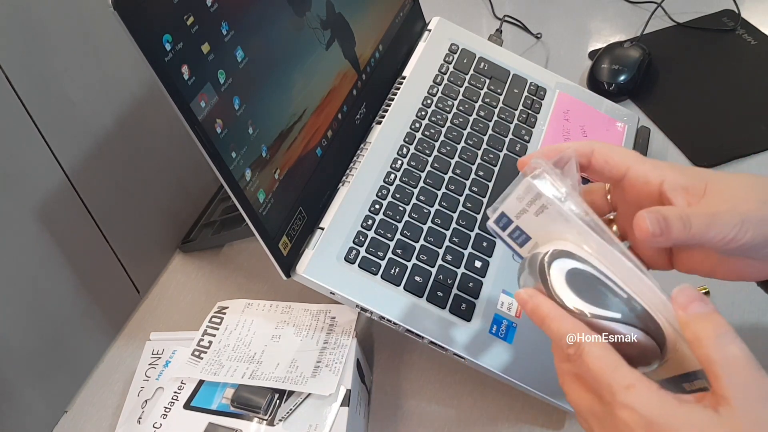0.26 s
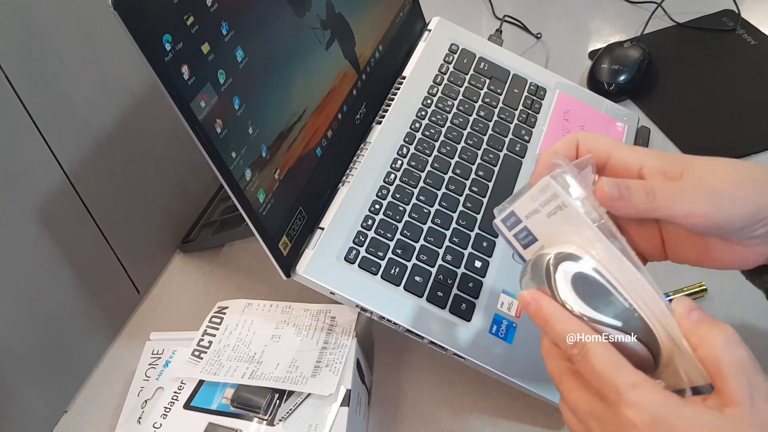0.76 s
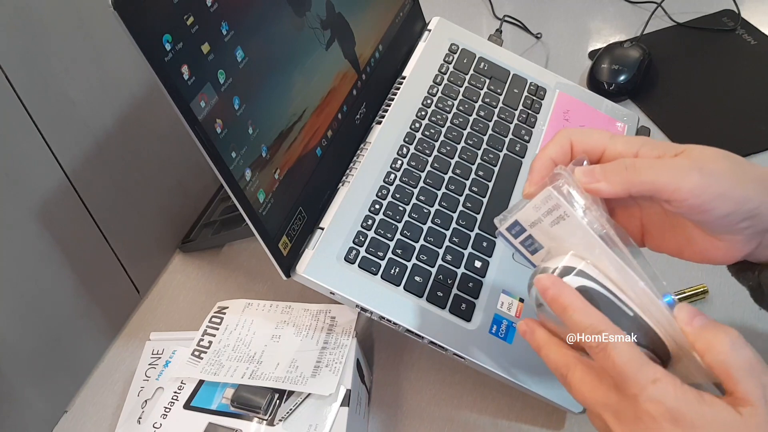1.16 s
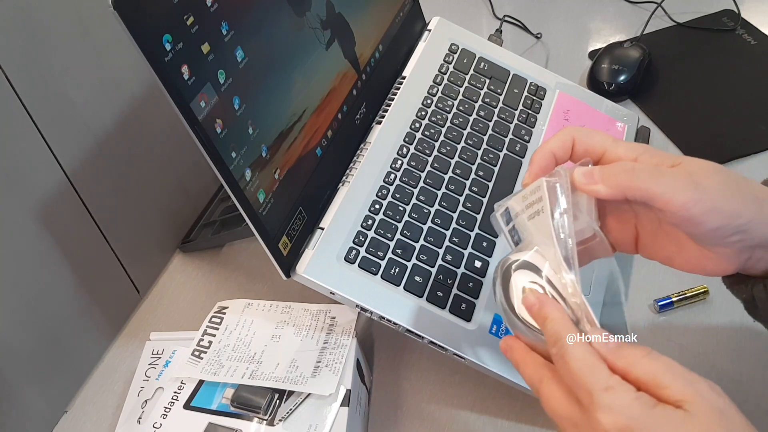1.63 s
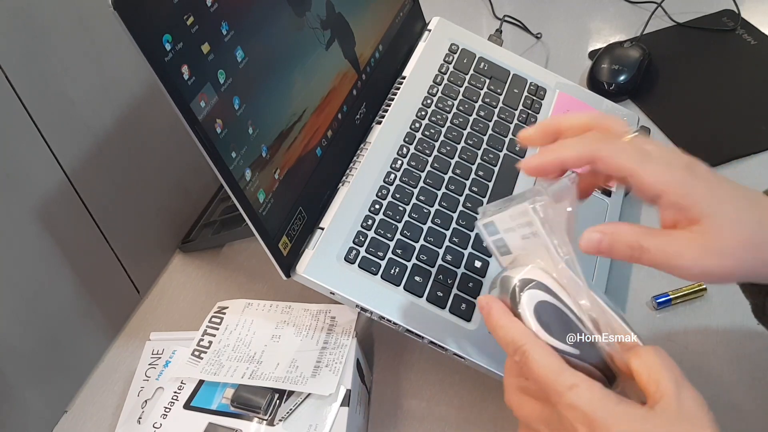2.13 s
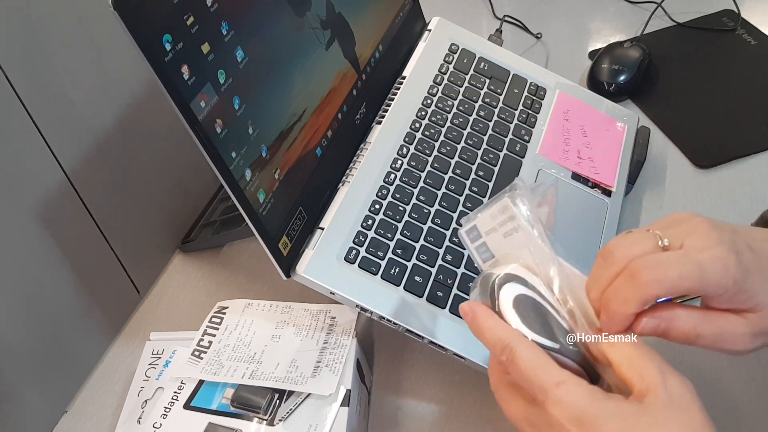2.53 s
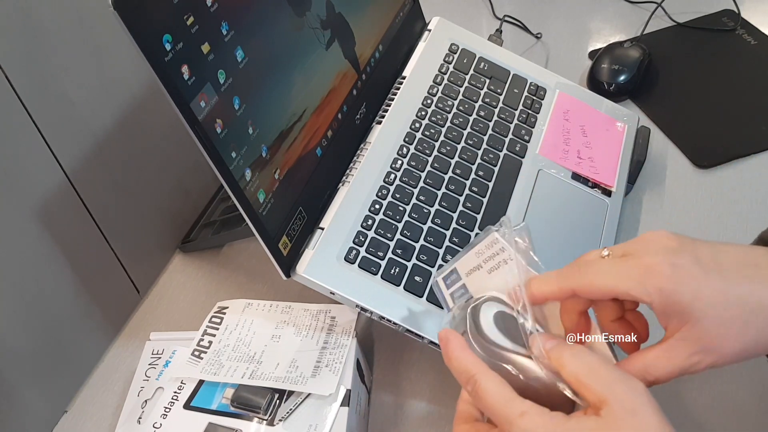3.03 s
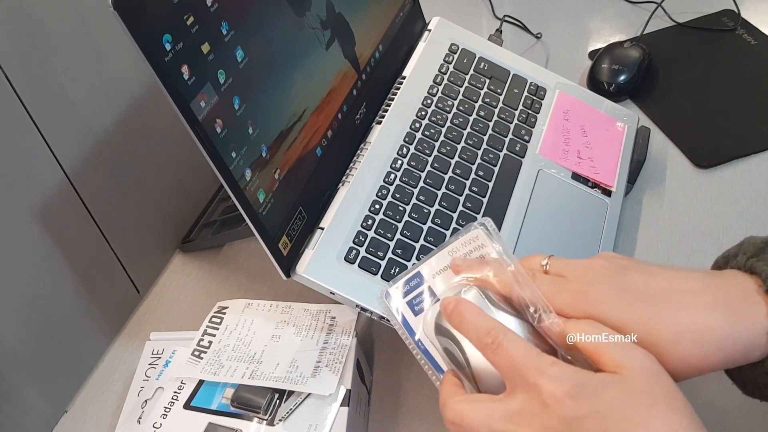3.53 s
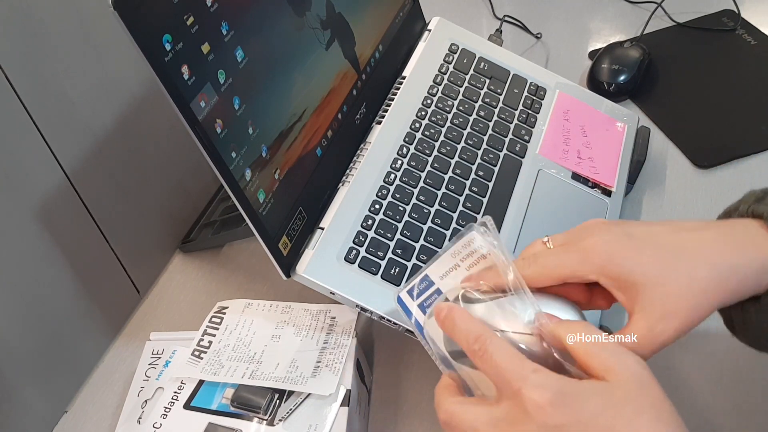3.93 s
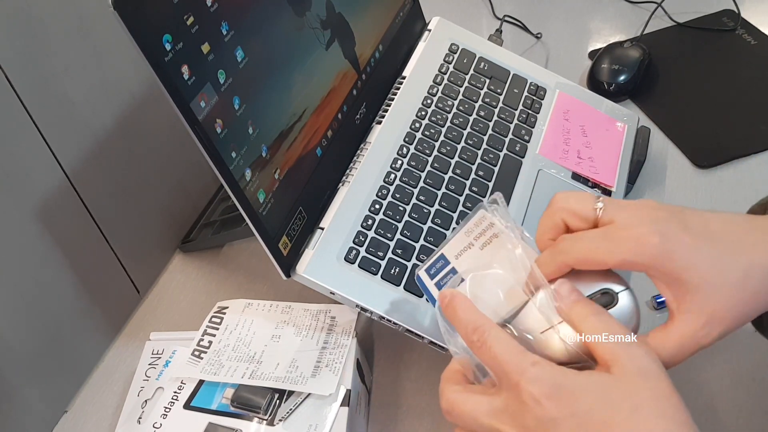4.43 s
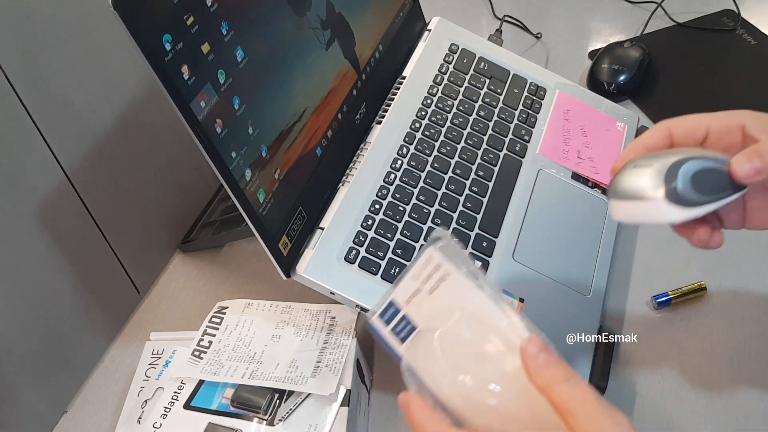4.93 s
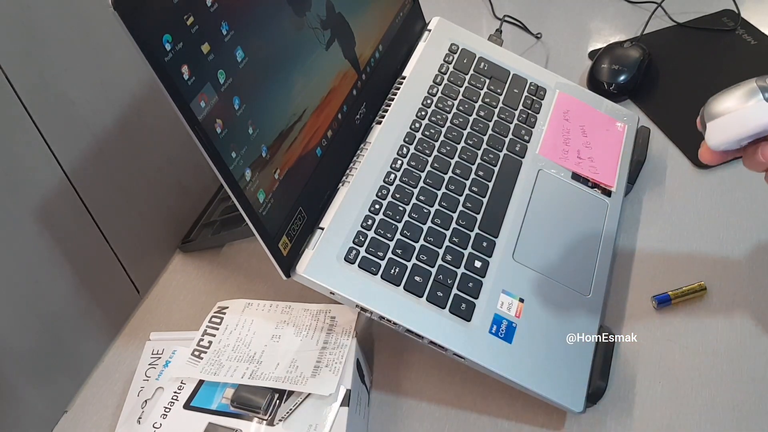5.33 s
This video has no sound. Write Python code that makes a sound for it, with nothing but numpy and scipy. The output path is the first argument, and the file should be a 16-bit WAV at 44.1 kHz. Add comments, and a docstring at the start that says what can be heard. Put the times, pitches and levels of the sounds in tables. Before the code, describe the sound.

Close, dry plastic crackling with one very loud early snap, scattered clicks and rustle, and a short sliding scrape before quiet returns.

```python
"""A low rumble, hiss and a faint rustle come first; then hands bend and pry open a stiff clear plastic
blister pack over a desk in a small quiet room. The seam creaks in stick-slip clicks through shell modes;
creases snap as a click and dying rattle that ring the hollow shell. Rustle is clumped, coloured grain noise;
late on, a hard object slides out in a scrape. Two spaced microphone ports hear it all with a room tail."""
import sys
import numpy as np
from scipy import signal
from scipy.fft import rfft, irfft, next_fast_len
from scipy.io import wavfile
from scipy.ndimage import uniform_filter1d

SR = 44100
rng = np.random.default_rng(int(sys.argv[2]) if len(sys.argv) > 2 else 0)


def transcribe(signal):
    """Save signal, clipped to [-1, 1], as a 16-bit WAV file at the path in sys.argv[1]."""
    frames = np.atleast_2d(signal).T
    limited = np.clip(frames, -1, 1)
    pcm = np.round(limited * 32767).astype(np.int16)
    wavfile.write(sys.argv[1], SR, pcm)


N = 245706


def from_db(db):
    """Decibels to amplitude gain."""
    return 10 ** (np.asarray(db) / 20)


def rms_one(x):
    """Scale to rms 1."""
    return x / np.sqrt(np.mean(x ** 2) + 1e-20)


def in_time(rows):
    """Interpolate the columns of a curve, sample by sample."""
    time_s, *columns = np.transpose(rows)
    return [np.interp(np.arange(N) / SR, time_s, column) for column in columns]


def at_hz(points, hz):
    """Interpolate a table over log frequency."""
    points_hz, values = np.array(points).T
    return np.interp(np.log(np.maximum(hz, 1)), np.log(points_hz), values)


def coloured(x, gain):
    """Filter in the frequency domain by a gain given as a function of Hz."""
    size = next_fast_len(x.shape[-1])
    spectrum = rfft(x, size) * gain(np.fft.rfftfreq(size, 1 / SR))
    return irfft(spectrum, size)[..., :x.shape[-1]]


def band(x, low_hz, high_hz):
    """Causal Butterworth band-pass."""
    return signal.sosfilt(signal.butter(2, [low_hz, high_hz], "band", fs=SR, output="sos"), x)


def resonance(x, hz, width_hz):
    """Two-pole resonance with gain 1 on top."""
    r = np.exp(-np.pi * width_hz / SR)
    poles = [1, -2 * r * np.cos(2 * np.pi * hz / SR), r * r]
    return signal.lfilter([(1 - r * r) / 2, 0, (r * r - 1) / 2], poles, x)


# likeness of left and right in diffuse sound: freq_hz, correlation
PORT_LIKENESS = [(60, 1), (180, 0.62), (550, 0.57), (1650, 0.0034), (4970, 0.43), (15000, 0.077)]


def diffuse(white):
    """Mix two noises into left and right, whose likeness depends on frequency."""
    mid = coloured(white[0], lambda hz: np.sqrt(1 + np.clip(at_hz(PORT_LIKENESS, hz), -1, 1)))
    side = coloured(white[1], lambda hz: np.sqrt(1 - np.clip(at_hz(PORT_LIKENESS, hz), -1, 1)))
    return np.array([mid + side, mid - side])


LEFT_LAG_S = 8e-5


def to_ports(x):
    """The pack is nearer to the right port: the left hears it later."""
    left = coloured(x[0], lambda hz: np.exp(-2j * np.pi * hz * LEFT_LAG_S))
    return np.array([left, x[1]])


def grit(count, spread_db):
    """Noise with uneven grain sizes; rms 1."""
    size_db = spread_db * np.minimum(rng.exponential(1, count), 4)
    return rms_one(rng.standard_normal(count) * from_db(size_db))


def scattered(colour, spread_db):
    """Dense grains from all over the sheet: partly direct, partly scattered to each port."""
    direct = grit(N, spread_db)
    spread = diffuse(np.array([grit(N, spread_db), grit(N, spread_db)]))
    return coloured(to_ports(direct + 0.78 * spread), lambda hz: from_db(at_hz(colour, hz)))


def clumps(spread_db):
    """A gain that comes and goes within a few milliseconds."""
    return from_db(spread_db * rms_one(uniform_filter1d(rng.standard_normal(N), size=250)))


# rumble and hiss spectrum: freq_hz, density_db (per Hz, relative)
QUIET_SPECTRUM = [(12, -47), (20, -14.5), (55, -5), (104, -4), (163, -20), (241, -34.5), (277, -33.5),
                  (310, -18), (347, -39.5), (499, -18), (542, -31.5), (802, -36.5), (8650, -53.5),
                  (12100, -36.5), (16000, -34.5)]
# balance of rumble and hiss: freq_hz, left_minus_right_db
QUIET_BALANCE = [(60, 0.5), (240, 6), (950, 0.5), (3770, -2), (15000, 0.5)]
QUIET_RMS_DB = -61.5


def quiet():
    """Steady rumble of the building and hiss of the microphone, as coloured diffuse noise."""
    left, right = diffuse(rng.standard_normal((2, N)))
    left = coloured(left, lambda hz: from_db(at_hz(QUIET_SPECTRUM, hz) + at_hz(QUIET_BALANCE, hz) / 2))
    right = coloured(right, lambda hz: from_db(at_hz(QUIET_SPECTRUM, hz) - at_hz(QUIET_BALANCE, hz) / 2))
    return from_db(QUIET_RMS_DB) * rms_one(np.array([left, right]))


# skin and contents rubbing on the sheet: time_s, level_db, treble_db (re level)
RUB_CURVE = [(0, -61.5, -8), (.08, -88, 4), (.19, -66.5, -1.5), (.34, -90, -10), (.82, -83, 0),
             (.86, -69, 4), (.95, -76.5, -1.5), (1.1, -73, 3), (1.2, -82, 7), (1.28, -46, 2),
             (1.33, -59.5, 1), (1.57, -54.5, 0.5), (1.62, -76, -5.5), (1.89, -77.5, 2), (1.93, -54, -5),
             (2.13, -59.5, -4), (2.23, -74, -8), (2.26, -69, 16), (2.33, -50, -6.5), (2.44, -67.5, 5),
             (2.6, -60, -5.5), (2.72, -74.5, -2.5), (2.86, -61, -1.5), (3.2, -62.5, -3), (3.27, -53, -1.5),
             (3.4, -61, -10), (3.68, -66.5, -0.5), (3.92, -56.5, -2), (4.03, -56.5, -6), (4.3, -63, 0),
             (4.42, -66.5, 0), (4.6, -59.5, 18), (4.67, -70.5, 0), (5.1, -81, 0), (5.45, -75, -3),
             (5.57, -63.5, 0)]
# rub grain spectrum: freq_hz, density_db (per Hz, relative)
RUB_SPECTRUM = [(150, -12), (320, 0), (560, 0), (900, -3), (1200, 0), (2000, -3), (3000, -5), (4500, -4),
                (8000, -14), (11000, -13), (16000, -17)]
# dull grains: level at a middle level of -63 dB; dB of dull swing per dB of middle swing
DULL_DB, DULL_FOLLOWS = -65.5, 0.76


def rub():
    """Fingers and contents rustle on the sheet; dull, middle and bright grains clump each in their own time."""
    level_db, treble_db = in_time(RUB_CURVE)
    dull_db = DULL_DB + DULL_FOLLOWS * (level_db + 63)
    grains = scattered(RUB_SPECTRUM, spread_db=3.5)
    rustle = 0
    for part_db, low_hz, high_hz, clump_db in [(level_db, 700, 3800, 2.4),
                                               (dull_db, 200, 800, 2.4),
                                               (level_db + treble_db, 2600, 16000, 2.2)]:
        part = rms_one(clumps(clump_db) * band(grains, low_hz, high_hz))
        rustle = rustle + from_db(part_db) * part
    return rustle


# stick-slip runs of the bent seam: start_s, end_s, slips_per_s (nominal), first_drive_db, last_drive_db
CREAK_RUNS = [(0.052, 0.104, 160, -77, -78), (0.212, 0.345, 155, -67, -95), (1.7, 1.897, 56, -75, -81),
              (1.915, 2.1, 110, -70, -67), (2.15, 2.243, 125, -57.5, -56.5), (2.528, 2.66, 56, -53, -80)]
# harder slips with a bright edge: time_s, drive_db, edge_db (re drive)
HARD_SLIPS = [(2.244, -42, 1.5), (2.255, -42, -12), (2.269, -41.5, -19), (2.279, -38.5, -9),
              (2.289, -48, -8), (2.302, -40, -27)]
# shell modes rung by the seam: freq_hz, width_hz, gain_db
SEAM_MODES = [(1190, 65, 5), (1354, 91, -6), (1500, 140, -22)]


def creak():
    """Slips of the seam, each a soft click into the shell's modes; hard ones add a short noise tick."""
    slips, edges = np.zeros((2, N))
    for start_s, end_s, per_s, first_db, last_db in CREAK_RUNS:
        live = slice(round(start_s * SR), round(end_s * SR))
        drift = rms_one(uniform_filter1d(rng.standard_normal(N), size=400))
        rate_per_s = per_s * from_db(2.8 * drift)[live]
        slip = np.diff(np.floor(np.cumsum(rate_per_s / SR)), prepend=0) > 0
        jitter_db = 3 * rng.standard_normal(N)[live]
        drive_db = np.linspace(first_db, last_db, slip.size) + jitter_db
        slips[live] = slip * np.sqrt(SR / per_s) * from_db(drive_db + 17.0)
    edge_fade = np.exp(-np.arange(300) / 105.0)   # samples
    for time_s, drive_db, edge_db in HARD_SLIPS:
        at = round(time_s * SR)
        slips[at] += from_db(drive_db + 32.5)
        edges[at:at + 300] += from_db(drive_db + edge_db) * rng.standard_normal(300) * edge_fade
    rings = sum(from_db(db) * resonance(slips + 1e-18, hz, width_hz) for hz, width_hz, db in SEAM_MODES)
    sound = band(rings, 850, 1750) + band(edges + 1e-18, 3000, 12000)
    return to_ports(sound * [[1], [1]])


# creases snapping through; part levels are peaks re level_db:
# time_s, level_db, hollow_hz, hollow_db, thud_db, crack_hz, crack_db, tick_db
CREASE_SNAPS = [(0.097, -62, 444, -31, -29, 5400, 4, 11.5), (0.187, -32, 1110, -2.5, -13, 4070, -3.5, -0.5),
                (0.194, -29.5, 1120, 1, -13, 3830, -7, 3), (0.2, -30.5, 1166, -2, -19, 3800, -6, -8),
                (0.972, -49, 1150, -5, -13, 4400, -5, 1), (0.994, -40, 1180, -5, -15, 2010, -10, 1.5),
                (1.016, -40.5, 590, -19, -13.5, 1890, -6, -20),
                (1.046, -24, 1260, -13, -17.5, 5260, -11, -9.5),
                (1.062, -32.5, 525, -9, -21, 4540, -1, -21), (1.069, -25, 1464, -13.5, -24, 2620, -13, -15),
                (1.222, -27, 1400, -18, -23, 3400, -4.5, -24), (1.265, -29, 1340, -11, -16, 3540, -4, -5.5),
                (1.328, -32, 1060, -2.5, -4, 1910, -26, -20),
                (1.346, 0, 1155, -12.5, -29.5, 2800, -4, -0.5),
                (1.364, -2.5, 1110, -15, -26.5, 2610, -27, -15),
                (1.545, -29.5, 1137, -17, -25.5, 2220, -4.5, -3.5),
                (1.558, -28, 1100, -12, -24.5, 2400, -5.5, -7.5),
                (1.572, -30, 1102, -15.5, -24, 2400, -5.5, -9),
                (1.654, -47, 1144, 1, -25.5, 3050, -3, -14.5),
                (1.681, -46, 492, -6, -18.5, 1880, -9.5, -26.5),
                (1.689, -51.5, 1085, 2.5, -3.5, 2490, 0.5, -30),
                (1.801, -59.5, 466, -3, -9.5, 2254, -14, -15.5),
                (1.813, -64.5, 531, 3, -7, 4960, -10.5, -25),
                (1.908, -29.5, 1290, -1, -14, 2400, -19, -0.5),
                (2.005, -20.5, 1180, -0.5, -24.5, 2050, -1, -19),
                (2.011, -25, 1160, -21, -10.5, 2100, 0.5, -23),
                (2.069, -33.5, 1120, -10.5, -14, 1970, -12, -23),
                (2.107, -31, 770, -4, -3.5, 1840, -1, -7.5), (2.316, -26, 1264, 0.5, -18, 1680, 0.5, -5),
                (2.349, -22, 1570, -39, -22, 2140, -8, -7.5),
                (2.485, -46, 1420, -27.5, -37, 2250, -1.5, -11),
                (2.505, -33, 1440, -5, -27.5, 3530, -2.5, -6), (2.518, -30.5, 1353, 4, -3, 1970, -25, -15),
                (2.555, -37, 1400, -4.5, -11, 2050, -13, -26),
                (2.576, -34, 1137, -2.5, -10, 1920, -14.5, -14),
                (2.603, -32.5, 1207, -4, -10, 1950, -4.5, -22),
                (2.813, -34, 1190, -7, -12.5, 1954, -10, -20), (2.854, -33.5, 579, -23, -29, 3450, -18, -6),
                (2.871, -44.5, 365, -1, -25, 1990, 1.5, 7),
                (2.899, -26.5, 483, -19, -11, 3570, -10.5, -7.5),
                (2.918, -27.5, 970, -9, -20, 3710, -13, -2), (3.052, -38, 1156, -9.5, -11.5, 4200, -8, -11),
                (3.218, -45, 463, -23, -20, 2100, -0.5, 5), (3.254, -36, 430, -12.5, -29, 2650, -6, -14),
                (3.306, -19, 549, -8, -5, 1910, -9, -12), (3.4, -47.5, 423, -10, -24, 3780, -7, 8.5),
                (3.432, -33.5, 1370, -6, -5.5, 3990, 5.5, 4), (3.692, -42.5, 548, -13, 1.5, 1900, -28, -30),
                (3.713, -35, 464, -15, -8, 2000, -13, -20), (3.751, -39, 1190, -10.5, -32, 3890, -26, 2),
                (3.827, -48.5, 490, -27, -10, 2630, -5, -14), (3.877, -30.5, 1220, -6.5, -22, 3500, 3, -8),
                (3.883, -35, 980, -22, -8, 1800, -1, -4), (4.047, -33.5, 1005, -16, -25, 3320, 1.5, -1.5),
                (4.058, -40, 1360, -10, -18, 1800, -5, -2), (4.066, -15, 1470, -15, -23, 4170, -4, -20),
                (4.185, -26, 900, -19.5, -25, 3320, -6, 0), (4.229, -40.5, 915, -6, -17, 2130, -4.5, -14),
                (4.268, -43, 567, -26, -37, 3270, -4.5, -26),
                (4.512, -28.5, 1030, -27, -28.5, 2260, 0.5, -22),
                (4.569, -21, 1160, -0.5, -14.5, 2430, -2, -4.5),
                (4.61, -17, 1170, -9.5, -14.5, 2300, -22, -13),
                (4.62, -17.5, 930, -10.5, -11, 1907, -22, -5),
                (4.716, -19, 1576, -10, -10.5, 1830, -0.5, -3.5),
                (4.722, -16.5, 680, -11.5, -20.5, 1850, -14.5, -10.5),
                (4.898, -51, 479, -16.5, -10.5, 2390, -20, -1.5),
                (5.543, -47, 493.7, -8.5, -19.5, 2040, -18.5, -5)]
# colour of crack and tick: freq_hz, gain_db
SHEET_COLOUR = [(1000, -10.5), (1700, 1.5), (2600, -1.5), (3500, -2), (4500, -4), (5500, -3), (7000, -2),
                (9500, -4), (12000, -5), (16000, -4.5)]
RATTLE_MS, RATTLE_SHORTENS = 4.16, .12   # decay at -30 dB; dB shorter per dB harder
RATTLE_DB, HOLLOW_RATTLE = 8.5, .75   # energy re click; share of the rattle that rings the hollow
HOLLOW_WIDTH, HOLLOW_WIDENS = .11, 0.23   # share of pitch at -30 dB; dB wider per dB harder
CRACK_WIDTH, CRACK_RING_DB = .07, 2   # share of pitch; ring added to the broad crack
SNAP_PAN_DB, SNAP_PAN_SPREAD_DB = 2, 0.7   # left minus right: mean, standard deviation


def snaps():
    """A sharp break, then a dying rattle of the sheet; returns the near sound and what feeds the room."""
    length, lead = 6000, 64   # samples
    out, t = np.zeros((3, N + length)), np.arange(length) / SR   # left, right, room feed
    click = 1. * (np.arange(length) == lead)
    sides = rng.standard_normal(len(CREASE_SNAPS))
    for row, side in zip(CREASE_SNAPS, sides):
        time_s, level_db, hollow_hz, hollow_db, thud_db, crack_hz, crack_db, tick_db = row
        rattle_s = RATTLE_MS / 1000 * from_db(-RATTLE_SHORTENS * (level_db + 30))
        fading = np.exp(-t / rattle_s) + from_db(-10.5) * np.exp(-t / (7.0 * rattle_s))
        # rattle and its quick reflections from desk and hands differ at the two ports
        grains = np.array([grit(length, spread_db=-1.5), grit(length, spread_db=-3.0)])
        rattle = diffuse(grains) * fading
        rattle = from_db(RATTLE_DB) * rattle / np.sqrt(np.mean(np.sum(rattle ** 2, axis=1)))
        rattle = np.roll(rattle, lead + 8, axis=1)
        # far away, all counts as one blow
        far_blow = click * np.sqrt(1 + from_db(2 * RATTLE_DB))
        blow = np.vstack([to_ports(click + rattle), far_blow])
        knock = np.vstack([to_ports(click + HOLLOW_RATTLE * rattle), far_blow])
        # main mode and two neighbours; a harder snap rings shorter
        width = np.clip(HOLLOW_WIDTH * from_db(HOLLOW_WIDENS * (level_db + 30)), .03, .5)
        hollow = sum(from_db(db) * resonance(knock, hollow_hz * ratio, hollow_hz * width)
                     for ratio, db in [(1.021, 3), (0.82, -13.0), (1.3, -8.0)])
        hollow = band(hollow, hollow_hz * .6, hollow_hz * 1.6)
        thud = band(blow, 220, 670)
        sheet = coloured(blow, lambda hz: from_db(at_hz(SHEET_COLOUR, hz)))
        crack_ring = resonance(sheet, crack_hz, crack_hz * CRACK_WIDTH)
        crack = band(sheet, 1200, 5500) + from_db(CRACK_RING_DB) * crack_ring
        tick = band(sheet, 3200, 13000)
        parts = [(hollow_db, hollow), (thud_db, thud), (crack_db, crack), (tick_db, tick)]
        sound = sum(from_db(db) * part / np.abs(part[:2]).max() for db, part in parts)
        at = round(time_s * SR) - lead
        pan_db = SNAP_PAN_DB + SNAP_PAN_SPREAD_DB * side
        out[:, at:at + length] += from_db(level_db + pan_db * np.array([[.5], [-.5], [0]])) * sound
    return out[:2, :N], out[2, :N]


# reverberation of the room: freq_hz, t60_s
ROOM_DECAY = [(150, 0.4), (500, 0.32), (1500, 0.27), (4000, 0.3), (9000, 0.17), (15000, 0.3)]
ROOM_DB = -9


def room(x):
    """The tail of the room: diffuse noise dying band by band, convolved with the feed."""
    t = np.arange(SR // 2) / SR
    white, tail = diffuse(rng.standard_normal((2, t.size))), 0
    edges_hz = 100 * 2. ** np.arange(0, 7.6, .5)
    for low_hz, high_hz in zip(edges_hz, edges_hz[1:]):
        t60_s = at_hz(ROOM_DECAY, np.sqrt(low_hz * high_hz))
        tail = tail + band(white, low_hz, high_hz) * from_db(-60 * t / t60_s)
    tail = tail * (1 - np.exp(-t / .006))   # the walls answer late
    response = from_db(ROOM_DB) * rms_one(tail) / np.sqrt(t.size)
    return signal.fftconvolve(x[None], response, axes=1)[:, :N]


# hard object sliding out along the shell: time_s, level_db, brightness_db (gain of the top band)
SLIDE_CURVE = [(4.36, -61, 13.5), (4.5, -38, 4), (4.552, -41, -31), (4.57, -36.5, 12), (4.6, -39.5, 8),
               (4.612, -26, 8.5), (4.65, -49, 8), (4.7, -79, 0)]
# scrape spectrum: freq_hz, density_db (per Hz, relative)
SLIDE_SPECTRUM = [(40, -32.5), (80, -6), (160, -34), (450, -18.5), (750, -13.5), (1150, -5), (1700, -14),
                  (2300, -8.5), (2900, -15), (3600, -16), (5000, -23.5), (16000, -51.5)]


def slide():
    """The object scrapes along the shell: dense grains whose level and brightness move along a curve."""
    level_db, bright_db = in_time(SLIDE_CURVE)
    t = np.arange(N) / SR
    grains = rms_one(scattered(SLIDE_SPECTRUM, spread_db=4.0) * clumps(spread_db=0.5))
    top = band(grains, 5200, 22000)
    sliding = (t > SLIDE_CURVE[0][0]) & (t < SLIDE_CURVE[-1][0])
    return from_db(level_db) * (grains + (from_db(bright_db) - 1) * top) * sliding


def scene():
    """The pack in the room over the quiet background."""
    near, far = snaps()
    friction = (creak() + rub() + slide()) * from_db([[1.1], [-1.1]])   # left, right
    return near + friction + room(far + friction[1]) + quiet()


STOPBAND_HZ = 16900


def record(dry):
    """The highest peaks are rounded by a tanh, the top is cut by a steep low-pass."""
    rounded = np.tanh(dry * 1.15) / 1.15
    return signal.sosfilt(signal.cheby2(14, 70, STOPBAND_HZ, fs=SR, output="sos"), rounded)


dry = scene()
out = record(dry)
transcribe(out)
```